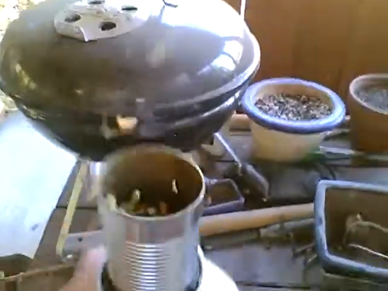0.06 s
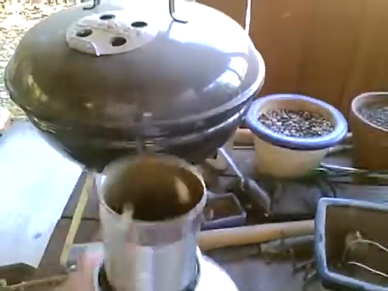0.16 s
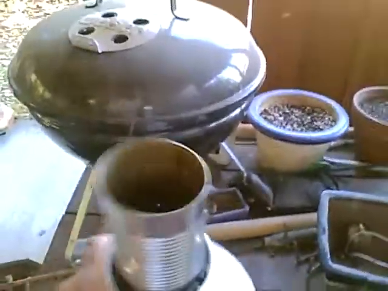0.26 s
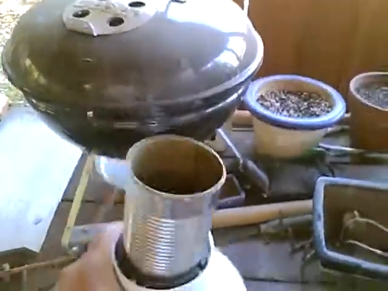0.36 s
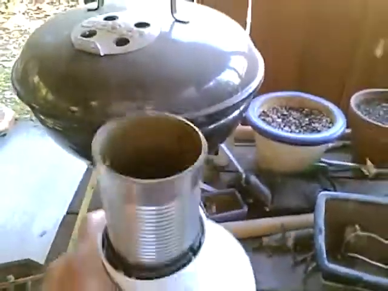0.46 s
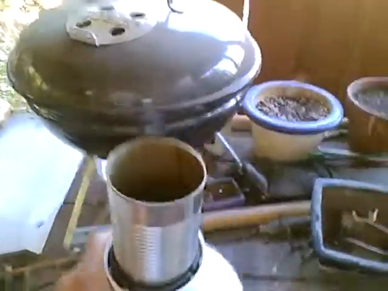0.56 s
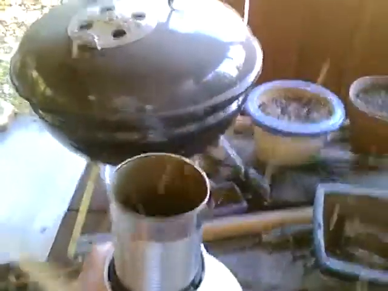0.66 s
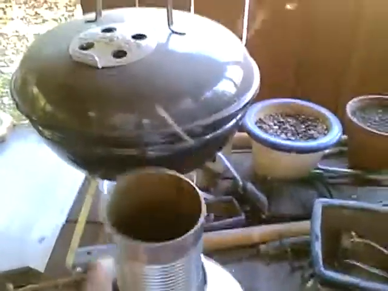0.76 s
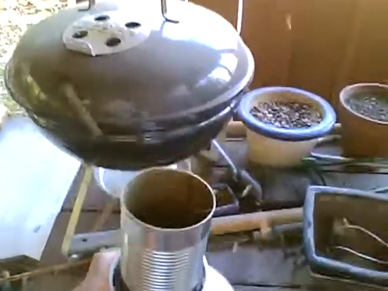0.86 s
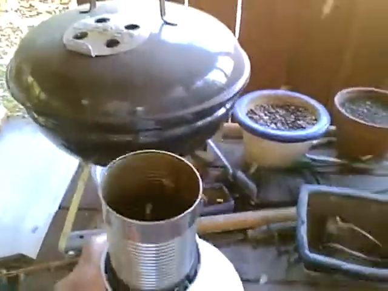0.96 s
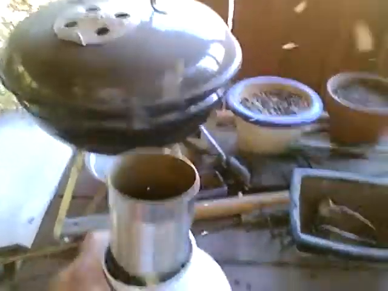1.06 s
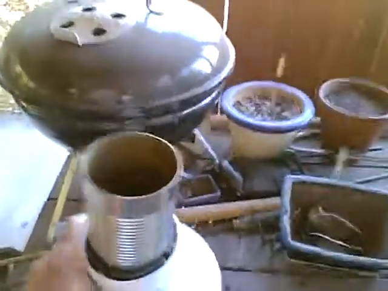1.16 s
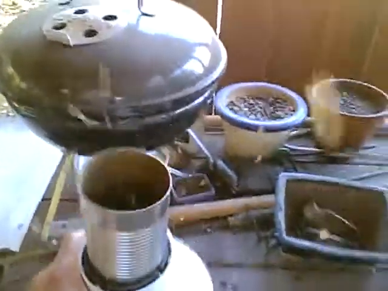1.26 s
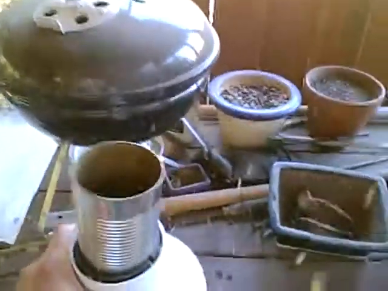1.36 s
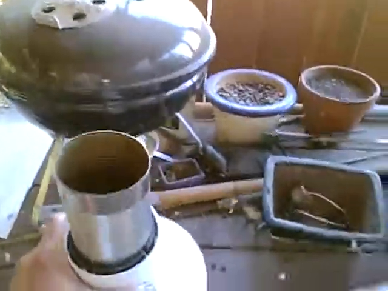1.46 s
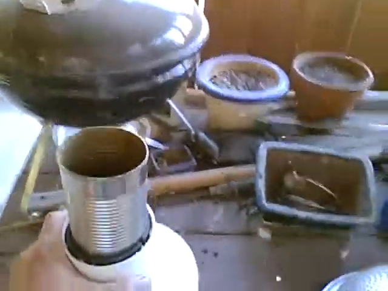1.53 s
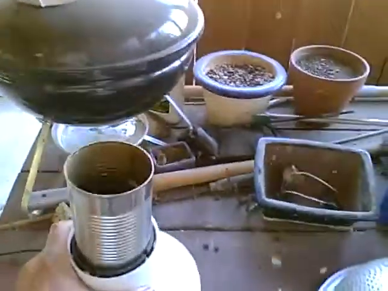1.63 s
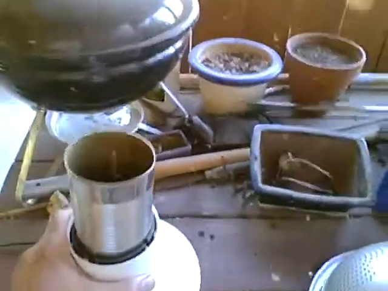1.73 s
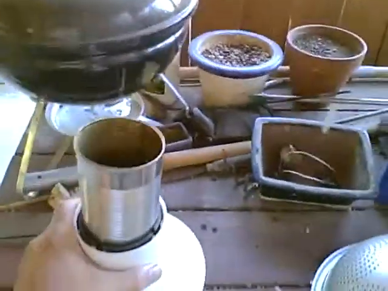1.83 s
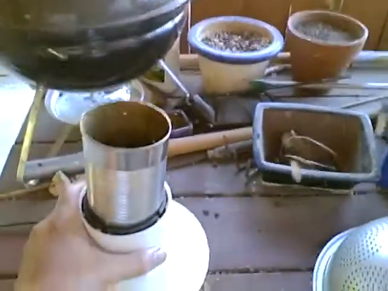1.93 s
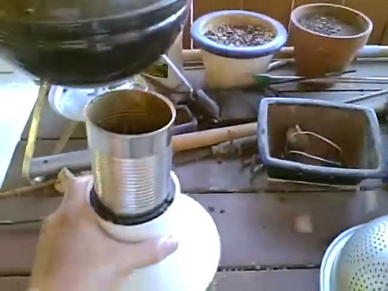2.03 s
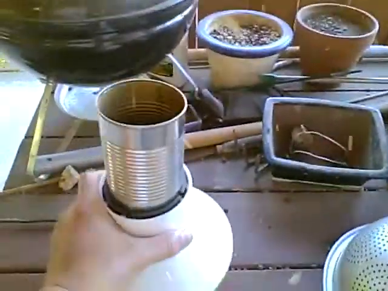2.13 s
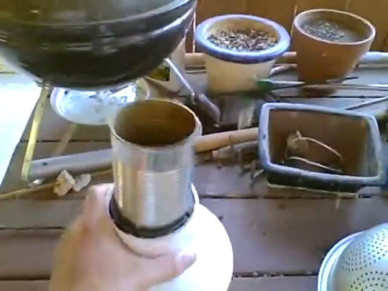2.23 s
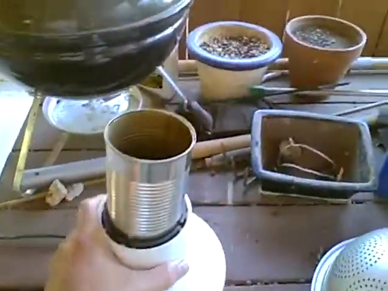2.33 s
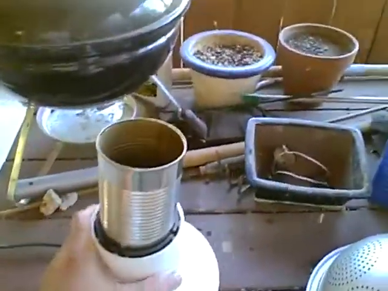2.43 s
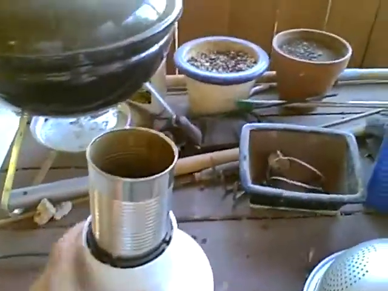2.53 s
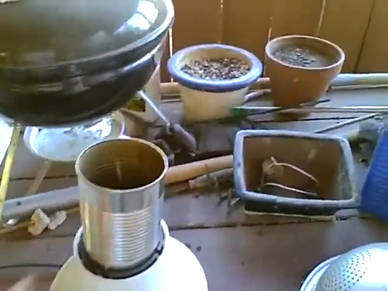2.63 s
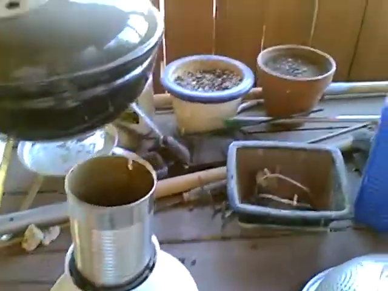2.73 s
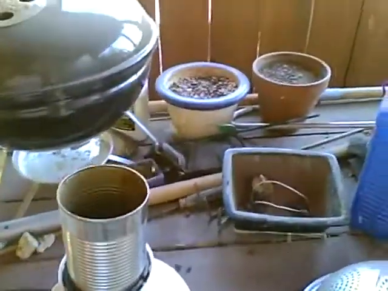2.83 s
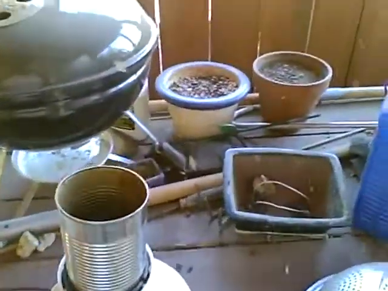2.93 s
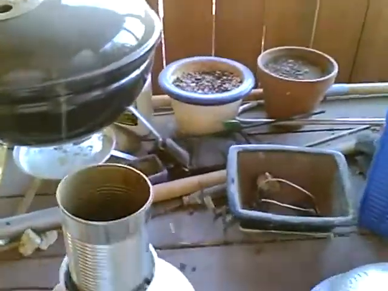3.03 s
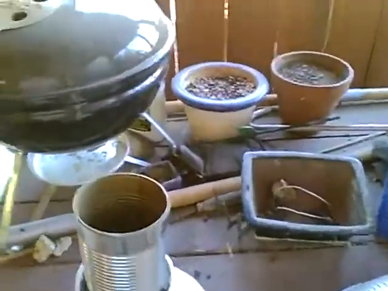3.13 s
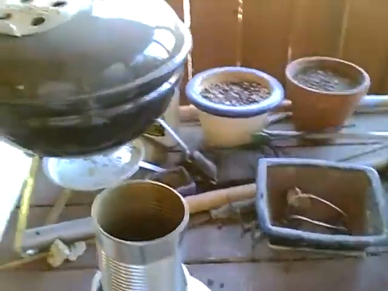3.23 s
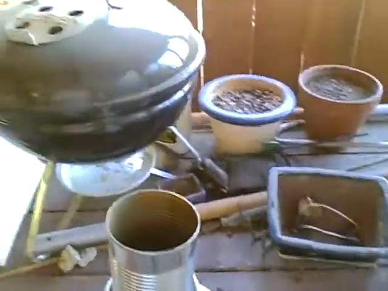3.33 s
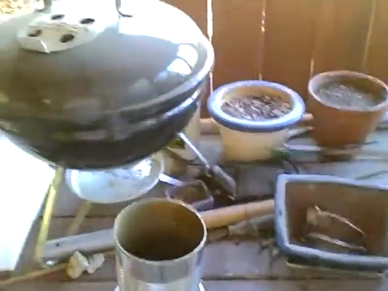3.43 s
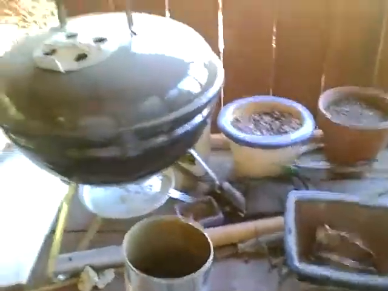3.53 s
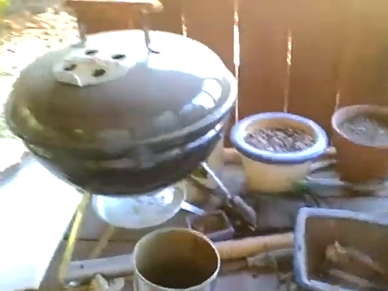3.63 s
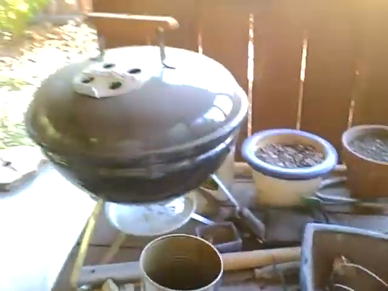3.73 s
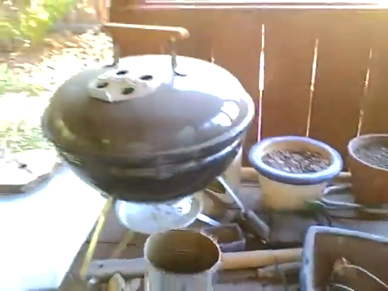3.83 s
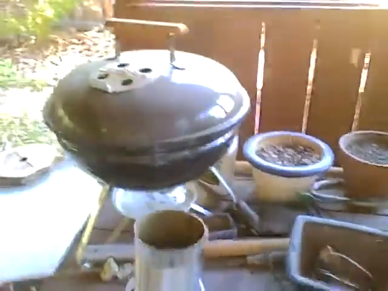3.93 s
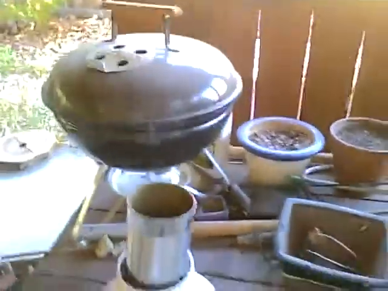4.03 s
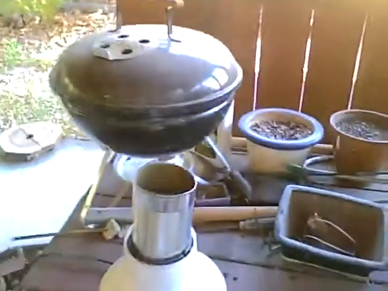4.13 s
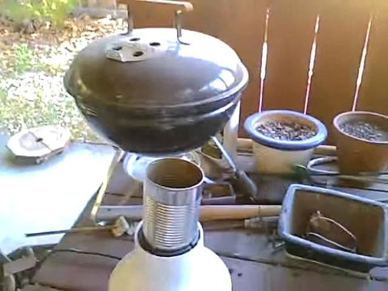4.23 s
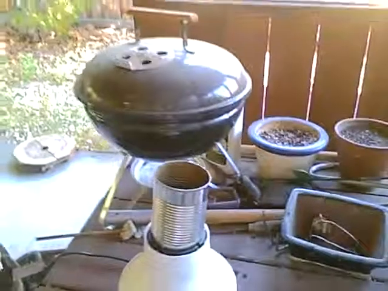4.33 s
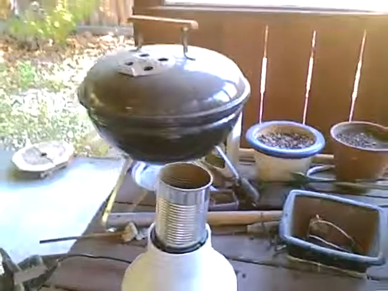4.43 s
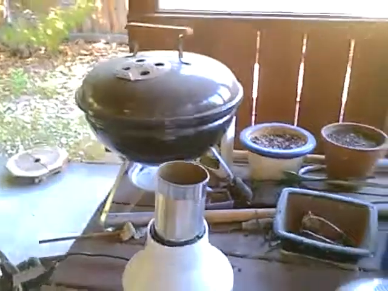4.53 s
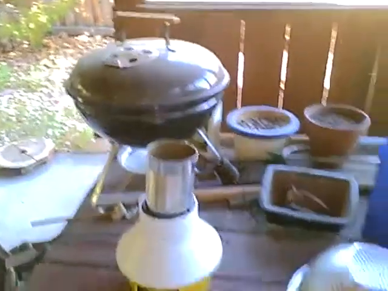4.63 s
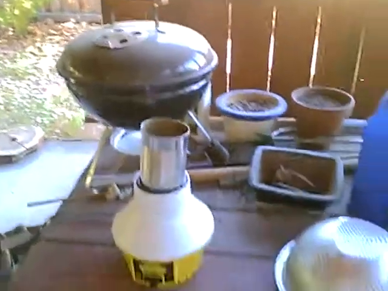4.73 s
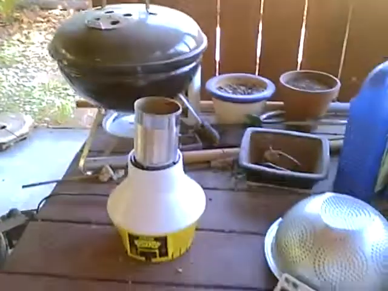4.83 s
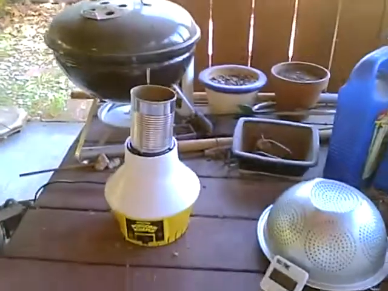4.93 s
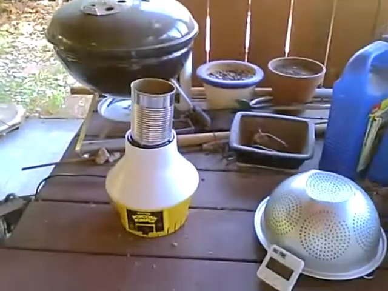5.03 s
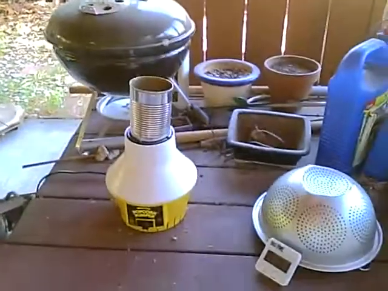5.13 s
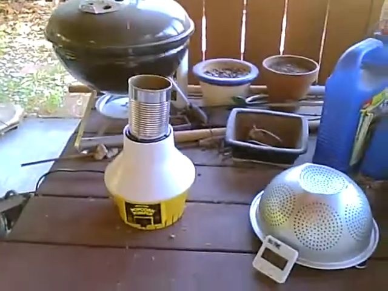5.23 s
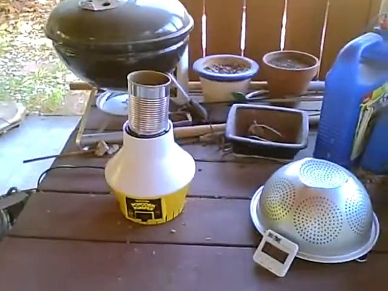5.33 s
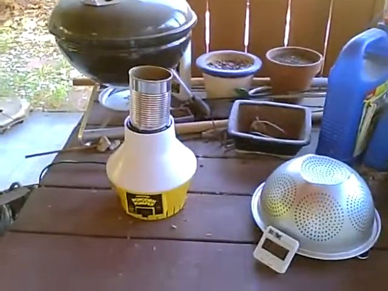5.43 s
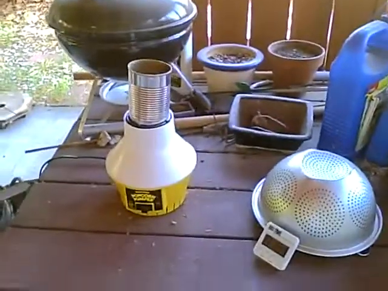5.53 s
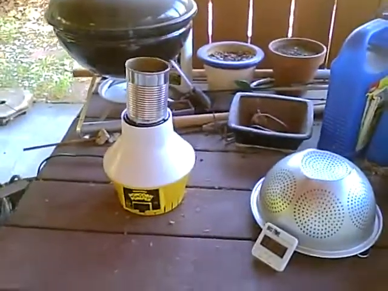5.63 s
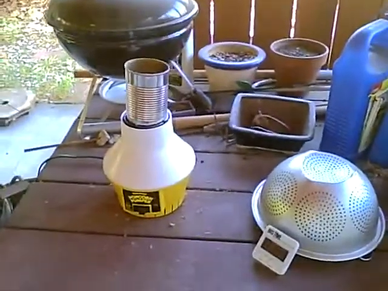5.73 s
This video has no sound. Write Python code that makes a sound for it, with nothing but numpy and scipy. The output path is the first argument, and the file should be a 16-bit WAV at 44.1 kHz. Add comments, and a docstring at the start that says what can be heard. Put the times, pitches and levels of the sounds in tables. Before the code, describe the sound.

A small hot-air fan roars and hums steadily while beans rattle in a shaken tin can, which is then knocked down on wooden boards.

```python
"""A hot-air popper with a tin can for a chimney roasts coffee on a wooden deck; its fan roars and hums throughout.
First a hand shakes it for about two seconds: beans swish and tick on the tin, the body scrapes, the fan buzzes.
Then it is let down with a crack, knocks and a scuff on the boards, and the fan runs back up to speed.
Last, the microphone backs away from the mouth of the can. Noise is shaped into air and friction,
sines make the fan, and random tiny blows make the beans and the rubbing."""
import sys
import numpy as np
from scipy import signal
from scipy.fft import rfft, irfft, next_fast_len
from scipy.io import wavfile

SR = 44100
rng = np.random.default_rng(int(sys.argv[2]) if len(sys.argv) > 2 else 0)


def dump(signal):
    """Clip the signal to [-1, 1] and save it as 16-bit WAV at the path in sys.argv[1]."""
    limited = np.clip(np.atleast_2d(signal).T, -1, 1)
    pcm = np.round(limited * 32767).astype(np.int16)
    wavfile.write(sys.argv[1], SR, pcm)


N = 255339
TIME = np.arange(N) / SR  # seconds

# Outdoor rumble. Each row: frequency in Hz, relative density in dB per Hz.
RUMBLE_SPECTRUM = [(12, -1), (28, 1.5), (40, 1), (58, -4.5), (90, -8.5), (130, -8), (180, -7.5),
                   (300, -1.5), (500, -18.5)]
# Low roar of the air stream. Each row: frequency in Hz, relative density in dB per Hz.
ROAR_SPECTRUM = [(85, -23), (135, -15.5), (170, -17), (210, -12), (300, -11), (400, -5.5), (500, 0),
                 (600, 2), (680, -12.5), (800, -14.5), (950, -14)]
# Rush through the vents. Each row: frequency in Hz, relative density in dB per Hz.
RUSH_SPECTRUM = [(600, -7), (720, -8), (880, 4), (990, -6.5), (1050, -7), (1130, 4), (1250, -4), (1390, 1),
                 (1490, -1.5), (1560, -7), (1750, -7.5), (2000, -4), (2350, -10.5), (2700, -16.5)]
# Hiss of the escaping air. Each row: frequency in Hz, relative density in dB per Hz.
HISS_SPECTRUM = [(2300, -16), (2550, -5.5), (2850, -5), (3250, -2.5), (3550, -2), (3950, -6), (4500, -5),
                 (5100, -9), (5600, -20.5)]
# Beans swirling in the air stream. Each row: frequency in Hz, relative density in dB per Hz.
SIZZLE_SPECTRUM = [(5200, -11), (5520, -1), (5670, -6.5), (5850, -1), (6050, -3), (6500, -0.5),
                   (6750, -13.5), (7050, -15), (7500, -32)]
# Air resonances of the roasting chamber. Each row: frequency in Hz, width in Hz, relative level in dB.
CHAMBER_MODES = [(435.8, 20, 0.5), (477.7, 17, -1), (702, 53, -7.5), (903, 25, -4), (1182, 28, -7.5),
                 (1375, 41, -10.5)]
# Higher air modes along and across the can. Each row: frequency in Hz, width in Hz, relative level in dB.
CAN_AIR_MODES = [(662, 160, 2.5), (786, 190, 1.5), (1760, 430, -21), (2508, 110, -12.5), (5860, 130, -10)]
# Hollow note of the can. Each row: time in seconds, pitch in Hz.
CHIMNEY_PITCH = [(0, 544), (3.4, 555), (3.95, 594), (4.4, 581), (5, 583)]
# The microphone hovers over the can, then backs away. Each row: time in seconds, distance in metres.
MIC_DISTANCE = [(0, 0.45), (1.2, 0.38), (2.2, 0.47), (3.0, 0.43), (3.6, 0.42), (4.3, 0.65), (5, 0.93),
                (5.79, 1.0)]
# The mouth of the can beams sound upwards. Each row: time in seconds, beam strength at the microphone in dB.
MOUTH_BEAM = [(0, -8.5), (1.9, -9.5), (2.7, -4), (3.65, 1), (4.1, -0.5), (4.7, -0.5), (5.1, -3.5),
              (5.79, -7)]
# Narrow hiss at the rim, its pitch set by the listening angle. Each row: time in seconds, pitch in Hz, level in dB.
RIM_HISS = [(0, 3230, -52), (2.2, 3180, -52), (2.9, 3430, -58), (3.5, 3450, -55), (3.95, 3270, -59),
            (4.2, 3200, -52), (4.55, 3250, -53), (4.9, 3190, -61), (5.79, 3380, -76)]
# Air notes that bloom as the microphone passes the mouth. Each row: peak in seconds, pitch in Hz, level in dB.
AIR_BLOOMS = [(3.86, 716, -40.5), (4.03, 710, -40), (4.5, 597, -40.5)]
# Strongest puffs of the can's hollow note. Each row: peak in seconds, level in dB.
NOTE_PUFFS = [(0.255, -35), (1.902, -30), (2.826, -29), (3.591, -32), (3.883, -33), (4.227, -32),
              (5.186, -33.5), (5.291, -34)]
# Fan hum, at the shaft rate. Each row: time in seconds, level in dB.
FAN_HUM = [(0, -48.5), (2, -55), (3.6, -55), (4.05, -49), (4.55, -44), (5, -43)]
# Fan whine. Each row: time in seconds, level of order 4 in dB, level of order 5 in dB.
FAN_WHINE = [(2.2, -53, -53), (2.9, -44.5, -40.5), (3.55, -41.5, -43), (4, -58, -58), (4.28, -47, -47),
             (4.48, -44, -37), (4.66, -46, -41), (4.95, -52, -49), (5.4, -47.5, -50), (5.79, -45, -55)]
# Weaker fan orders. Each row: multiple of the shaft rate, level in dB.
WEAK_ORDERS = [(3, -51.5), (6, -55)]
# Buzz of the shaken fan as it rubs. Each row: multiple of the shaft rate, relative level in dB.
BUZZ_ORDERS = [(1, -12), (2, -3.5), (3, -2), (4, 0.5), (5, 3), (6, 2)]
# Base on the boards. Each row: frequency in Hz, relative density in dB per Hz.
BOARD_SPECTRUM = [(25, -9), (60, -11), (130, -17), (300, -1), (500, -4), (900, -5.5), (1350, 1),
                  (1750, -11.5), (2100, -7), (2800, -14.5), (3300, -9.5), (5000, -31), (6500, -19.5),
                  (7300, -40)]
# Boom of the boards under the skidding base. Each row: frequency in Hz, relative density in dB per Hz.
BOOM_SPECTRUM = [(30, 2), (65, 1), (130, -3), (220, -6)]
# Rim of the base cracking on the boards. Each row: frequency in Hz, relative density in dB per Hz.
CRACK_SPECTRUM = [(150, 3), (350, 6), (600, 5), (1400, 9), (2200, -2), (3500, -2), (5200, -11.5),
                  (6000, -21)]
# Knocks. Each row: start in seconds, clack peak in dB, clack pitch in Hz, thud peak in dB.
KNOCK_BLOWS = [(1.174, -18.5, 1000, -54), (1.431, -20, 1000, -49), (1.45, -21, 1290, -50),
               (1.839, -32, 596, -28), (2.357, -29, 1260, -22), (2.372, -23, 420, -31),
               (2.381, -26.5, 383, -32), (2.388, -28, 397, -28), (2.398, -24, 1270, -29),
               (2.41, -32, 480, -29), (2.419, -21, 1240, -27), (2.445, -26, 442, -39)]
# The tin sings where it rubs in its seat. Each row: peak in seconds, pitch in Hz, level in dB, half-length in seconds.
TIN_SQUEAKS = [(0.526, 2140, -37, 0.02), (0.513, 1210, -25, 0.023), (0.805, 1194, -25.5, 0.02),
               (0.832, 1457, -27, 0.028), (0.89, 1204, -23, 0.034), (0.97, 2120, -33.5, 0.027),
               (1.254, 1444, -33, 0.03), (1.273, 2130, -39, 0.016), (1.306, 1460, -32, 0.021),
               (1.369, 1220, -25.5, 0.031), (1.442, 1470, -35, 0.026), (1.443, 2130, -34.5, 0.026),
               (2.4, 1290, -27, 0.006), (2.418, 1240, -32, 0.005)]
# Rubbing body. Each row: frequency in Hz, relative density in dB per Hz.
SCRAPE_SPECTRUM = [(330, -15.5), (450, -20.5), (620, -7.5), (800, 6), (1000, 6.5), (1250, 7.5), (1470, 2),
                   (1620, -24.5), (2100, -27), (3000, -11), (5000, -32)]
# Juddering housing. Each row: frequency in Hz, relative density in dB per Hz.
JUDDER_SPECTRUM = [(50, -17), (120, -13), (170, -22.5), (230, 1.5), (330, 0), (440, 7), (600, -9.5)]
# Ringing can and housing. Each row: frequency in Hz, relative level in dB, time to fall 60 dB in seconds.
CAN_MODES = [(470.2, -1, 0.2), (710, -7, 0.45), (1000, -8.5, 0.064), (1204, -8, 0.13), (1480, -10.5, 0.05),
             (2135, -9.5, 0.088)]
# Strokes that rub the body. Each row: start in seconds, rise in seconds, length in seconds, initial force in dB.
RUB_STROKES = [(0.01, 0.077, 0.16, -32), (0.401, 0.077, 0.12, -23.5), (0.647, 0.14, 0.36, -21.5),
               (1.181, 0.057, 0.28, -24.5), (1.588, 0.025, 0.067, -33)]
# Jolts that judder the housing harder. Each row: peak in seconds, level in dB.
HOUSING_JOLTS = [(0.045, -42.5), (0.485, -36.5), (0.71, -41), (0.895, -34), (0.96, -35), (1.35, -31.5),
                 (1.385, -28), (1.42, -33), (1.63, -40.5), (1.85, -43), (2.378, -34)]
# Single beans that hit the tin hard. Each row: start in seconds, peak level in dB.
BEAN_PINGS = [(0.059, -24), (0.1895, -39), (0.225, -29), (0.291, -17), (0.2962, -25), (0.321, -19),
              (0.459, -32), (0.5187, -23.5), (0.6998, -26), (0.766, -30), (0.8124, -19), (0.8302, -25),
              (0.8358, -21), (0.8403, -27), (0.8964, -30), (1.032, -22), (1.2472, -31), (1.426, -36),
              (1.469, -27), (1.735, -26), (1.797, -29), (2.393, -30.5), (2.402, -37), (2.412, -31),
              (2.42, -35)]
# Beans on tin. Each row: frequency in Hz, relative density in dB per Hz.
SWISH_SPECTRUM = [(1500, -17.5), (2300, 3), (2750, -8), (3250, -4), (3650, 0), (4050, -8.5), (4600, -5),
                  (5250, -6.5), (5750, 0.5), (6100, 2.5), (6550, 9.5), (6800, -16), (7050, -14),
                  (7550, -12.5)]
# Thin rings of the tin. Each row: frequency in Hz, relative level in dB, time to fall 60 dB in seconds.
TIN_MODES = [(2180, -4, .06), (3680, -14.5, 0.08), (5870, -8.5, 0.06), (6050, -7, 0.07), (6310, -4.5, 0.08),
             (6484, 1.5, 0.079), (6660, -5.5, 0.04)]
# Bunches of beans thrown on the tin, about four a second and again at the landing.
# Each row: peak in seconds, rise in seconds, fall in seconds, force in dB, extra clatter in dB.
BEAN_THROWS = [(0.022, 0.066, 0.035, -29.5, 1), (0.205, 0.035, 0.037, -41, 5.5),
               (0.314, 0.023, 0.037, -25.5, 0), (0.475, 0.022, 0.023, -38, 2),
               (0.545, 0.027, 0.042, -31, 1), (0.715, 0.025, 0.022, -40.5, 3.5),
               (0.82, 0.036, 0.04, -30, 0.5), (0.838, 0.0085, 0.0056, -35.5, 10.5),
               (1.03, 0.046, 0.038, -32.5, 1), (1.265, 0.057, 0.052, -36, 3.5),
               (1.51, 0.059, 0.046, -33, 1), (1.722, 0.034, 0.061, -36, -1), (2.32, 0.021, 0.025, -46.5, 0),
               (2.398, 0.04, 0.025, -44, 4)]


def amp(db):
    """Decibels to gain."""
    return 10 ** (np.asarray(db) / 20)


def unit(x):
    """Scales to rms 1."""
    return x / np.sqrt(np.mean(x ** 2) + 1e-20)


def follow(rows, axis=1):
    """One column of a curve, joined by straight lines, at every sample."""
    rows = np.asarray(rows)
    return np.interp(TIME, rows[:, 0], rows[:, axis])


def drift(hz):
    """Slow random wander of rms 1, up to about the given rate."""
    size = next_fast_len(N, real=True)
    f = np.fft.rfftfreq(size, 1 / SR)
    smooth = rfft(rng.standard_normal(size)) * np.exp(-(f / hz) ** 2)
    return unit(irfft(smooth, size)[:N])


def colour(x, points, size=4096):
    """Causal (minimum-phase) filter with the given spectrum, falling 48 dB an octave beyond its ends."""
    hz, db = np.transpose(points)
    octave = np.log2(abs(np.fft.fftfreq(size, 1 / SR)) + 1)
    beyond = abs(octave - np.clip(octave, np.log2(hz[0]), np.log2(hz[-1])))
    gain_db = np.maximum(np.interp(octave, np.log2(hz), db) - 48 * beyond, -90)
    log_gain = np.log(amp(gain_db))
    taps = np.fft.ifft(np.exp(np.conj(signal.hilbert(log_gain)))).real
    return signal.oaconvolve(x, taps)[:len(x)]


def resonate(x, hz, width):
    """One resonance, fixed or moving; broad noise comes out at the same power whatever the width."""
    turn = np.exp(2j * np.pi * np.cumsum(hz * np.ones(N)) / SR)
    r = np.exp(-np.pi * width / SR)
    # shift the pitch down to zero, smooth, shift back up
    return (turn * signal.lfilter([np.sqrt(1 - r * r)], [1, -r], x / turn)).real


def ring(x, modes, bend=0):
    """Blows played through a table of modes; bend is the share by which each wanders in pitch."""
    total = 0
    for hz, db, t60 in modes:
        pitch = hz * (1 + bend * drift(hz=13)) if bend else hz
        total = total + amp(db) * resonate(x, pitch, width=np.log(1000) / np.pi / t60)
    return unit(total)


def pipe_note(hz, width):
    """Turbulence caught in one air mode: a fuzzy note with steep sides."""
    return unit(resonate(resonate(rng.standard_normal(N), hz, width), hz, width))


def impacts(per_s, spread_db):
    """A random train of tiny blows, a few much harder than the rest."""
    size = amp(spread_db * np.minimum(rng.exponential(1, N), 3.5))
    return unit(size * rng.choice([-1, 1], N) * (rng.random(N) < per_s / SR))


def swells(rows, half_s):
    """Gain of a series of bell-shaped swells."""
    return np.sqrt(sum(amp(db) ** 2 * np.exp(-((TIME - s) / half_s) ** 2) for s, db in rows))


def stroke(start, length, attack, release):
    """Envelope that rises, holds to the end of its length and dies away."""
    rise = np.clip((TIME - start) / attack, 0, 1)
    return rise * np.exp(-np.maximum(TIME - start - length, 0) / release)


def heard(at_1m_db, halving_db):
    """Gain at the microphone's distance: the gain at 1 m, plus a step for each halving of the distance."""
    return amp(at_1m_db - halving_db * np.log2(follow(MIC_DISTANCE)))


def deck(x, delay_s):
    """The boards return the sound a little later, hollowing its colour."""
    returned = colour(x, [(20, -8.0), (1300, 5.5), (2600, -14), (7000, -19.5)])  # the treble scatters
    delayed = np.interp(TIME - delay_s, TIME, returned, left=0)
    return x + 0.21 * follow(MIC_DISTANCE) ** 2 * delayed  # the reflection fades close to the can


def fan_speed():
    """Turns per second: shaking drags the fan down, and it recovers once left alone."""
    free_hz, sag_hz = 249.9, 6.5
    shaken_until_s, recover_s = 1.85, 0.75
    return free_hz - sag_hz * np.exp(-np.maximum(TIME - shaken_until_s, 0) / recover_s)


def shaft(orders, waver, flicker_db):
    """Multiples of the shaft rate, each a sine that flickers on its own; waver is a share of the speed."""
    turns = np.cumsum(fan_speed() * (1 + waver * drift(hz=13.8))) / SR
    total = 0
    for multiple, db in orders:
        level = np.sqrt(2) * amp(db + flicker_db * drift(hz=11))
        total = total + level * np.sin(2 * np.pi * (multiple * turns + rng.random()))
    return total


def throws(clatter=False):
    """How hard the beans press on the tin, or how loudly they clatter: each bunch builds up and trails off."""
    power = 0
    for s, rise, fall, db, clatter_db in BEAN_THROWS:
        side = np.where(TIME < s, rise, fall)
        power = power + amp(db + clatter * clatter_db) ** 2 * np.exp(-((TIME - s) / side) ** 2)
    return np.sqrt(power)


def outdoors():
    """Steady low noise of the open air."""
    return amp(-53.5) * unit(colour(rng.standard_normal(N), RUMBLE_SPECTRUM))


def air_roar():
    """Broad turbulence, with the air of the chamber and the hollow note of the can excited by it."""
    eddies = unit(colour(rng.standard_normal(N), ROAR_SPECTRUM))
    swirl = colour(rng.standard_normal(N), [(400, 0), (1400, 0)])  # a flat band
    chamber = unit(sum(amp(db) * resonate(swirl, hz, width) for hz, width, db in CHAMBER_MODES))
    hollow = pipe_note(follow(CHIMNEY_PITCH), width=40.7)
    chimney = unit(hollow * amp(0.78 * drift(hz=22)))  # its level flickers
    return amp(-4.5) * eddies + amp(-7.0) * chamber + amp(-4.5) * chimney


def air():
    """Turbulence roars in chamber and can, rushes through the vents and hisses out; swirling beans sizzle."""
    beam_db = follow(MOUTH_BEAM)
    higher = unit(sum(amp(db) * pipe_note(hz, width) for hz, width, db in CAN_AIR_MODES)) * amp(beam_db)
    rush = unit(colour(rng.standard_normal(N), RUSH_SPECTRUM))
    spits = amp(-11.5) * impacts(per_s=750, spread_db=4.5)
    hiss = unit(colour(rng.standard_normal(N) + spits, HISS_SPECTRUM))
    grains = amp(5.5) * impacts(per_s=1300, spread_db=2.5)
    sizzle = unit(colour(rng.standard_normal(N) + grains, SIZZLE_SPECTRUM))
    sizzle = sizzle * amp(0.44 * beam_db)  # follows only part of the beam's swing
    vent_note = pipe_note(1400, width=140)  # breathy, carries only a short way
    blown = (air_roar() * heard(at_1m_db=-37.5, halving_db=3.75)
             + higher * heard(at_1m_db=-46.5, halving_db=4.8)
             + rush * heard(at_1m_db=-44, halving_db=3.43)
             + hiss * heard(at_1m_db=-54.5, halving_db=4.17)
             + sizzle * heard(at_1m_db=-56, halving_db=4.6)
             + vent_note * heard(at_1m_db=-55, halving_db=7.3))
    flutter_db = 0.5 * drift(hz=25)
    return deck(blown * amp(flutter_db), delay_s=0.00287)


def rim_hiss():
    """Air shearing over the rim hisses in one narrow band."""
    return pipe_note(follow(RIM_HISS), width=290) * amp(follow(RIM_HISS, axis=2))


def bloom():
    """Hollow notes of the can, each heard only from one narrow angle: narrow noise that swells and fades."""
    return sum(pipe_note(hz, width=100) * swells([(s, db)], half_s=0.076) for s, hz, db in AIR_BLOOMS)


def puffs():
    """Now and then the air stream locks onto the hollow note of the can: a wavering sine for a moment."""
    turns = np.cumsum(follow(CHIMNEY_PITCH) * (1 + 0.023 * drift(hz=40))) / SR
    return np.sqrt(2) * np.sin(2 * np.pi * turns) * swells(NOTE_PUFFS, half_s=0.013)


def motor():
    """The fan hums and whines; its orders swell and fade as the microphone moves through the sound field."""
    strong = [(1, follow(FAN_HUM)), (4, follow(FAN_WHINE, axis=1)), (5, follow(FAN_WHINE, axis=2))]
    return shaft(strong + WEAK_ORDERS, waver=0.001825, flicker_db=0.37)


def scuff():
    """The base skids and chatters over the deck as it settles; the boards boom and the can rings along."""
    start_s, length_s = 2.35, 0.048
    slips = impacts(per_s=1500, spread_db=2.0)
    ringing = unit(colour(ring(slips, CAN_MODES), [(420, 0), (2200, 0)]))
    force = amp(-32.5) * stroke(start_s, length_s, attack=0.022, release=0.052)
    boom = unit(colour(slips, BOOM_SPECTRUM)) * stroke(start_s, length_s, attack=0.01, release=0.042)
    skid = unit(colour(slips, BOARD_SPECTRUM)) + amp(-8.0) * ringing
    return skid * force + amp(-45.0) * boom


def crack(size=4096):
    """The rim of the base lands first: hard plastic meets wood in one short, bright blow."""
    out, t = np.zeros(N), np.arange(size) / SR
    grit = 0.17 * rng.standard_normal(size) * np.exp(-t / 0.0017)
    blow = colour((t == 0) + grit, CRACK_SPECTRUM)
    out[round(2.357 * SR):][:size] = amp(-18) * blow / abs(blow).max()
    return out


def knocks(size=8192):
    """Short blows: a clack from one panel of the housing, and a thud of the base on the boards."""
    out, t = np.zeros(N + size), np.arange(size) / SR
    for s, clack_db, clack_hz, thud_db in KNOCK_BLOWS:
        blow = 0.86 * rng.standard_normal(size) * np.exp(-t / 0.004) + np.exp(-t / 0.0001)
        thud = colour(blow, BOARD_SPECTRUM)
        clack = np.sin(2 * np.pi * clack_hz * t) * np.exp(-t * clack_hz / 3.2)  # dies within a few cycles
        for db, sound in ((clack_db, clack), (thud_db, thud)):
            out[round(s * SR):][:size] += amp(db) * sound / abs(sound).max()
    return out[:N]


def squeaks():
    """Rubbing keeps one mode of the tin going: brief sines, unsteady in pitch and level."""
    unsteady = np.cumsum(1 + 0.008 * drift(hz=90)) / SR
    notes = 0
    for s, hz, db, half_s in TIN_SQUEAKS:
        tone = np.sin(2 * np.pi * (hz * unsteady + rng.random()))
        notes = notes + tone * swells([(s, db)], half_s)
    return notes * amp(1.2 * drift(hz=70))


def scrape():
    """The shaken body sticks and slips; the slips ring the can, the housing judders and the fan rubs."""
    rubbing = 0
    for s, rise, length, db in RUB_STROKES:
        eased_db = db - 11.5 * (TIME - s)  # the grip eases through a stroke, in dB per second
        rubbing = rubbing + amp(eased_db) * stroke(s, length, rise, release=0.08)
    chatter = amp(0.34 * drift(hz=45))  # the contact grabs and lets go, slightly
    force = chatter * np.hypot(rubbing, amp(-3.5) * throws())  # thrown beans push the body too
    slips = impacts(per_s=2200, spread_db=2.5)
    bent = ring(slips, CAN_MODES, bend=0.007)  # the changing grip pulls the modes off pitch
    ringing = unit(colour(bent, [(420, 0), (2200, 0)]))
    buzz = unit(shaft(BUZZ_ORDERS, waver=0.0034, flicker_db=4))
    body = amp(-4.5) * unit(colour(slips, SCRAPE_SPECTRUM)) + amp(-9.0) * ringing + amp(-7.5) * buzz
    judder = unit(colour(impacts(per_s=660, spread_db=2.5), JUDDER_SPECTRUM))
    judder_force = np.hypot(amp(-16.5) * rubbing, swells(HOUSING_JOLTS, half_s=0.017))
    return body * force + judder * judder_force


def pings(size=2048):
    """Single beans stand out of the shower as sharp ticks of decaying noise."""
    out, t = np.zeros(N + size), np.arange(size) / SR
    for s, db in BEAN_PINGS:
        tick = colour(rng.standard_normal(size) * np.exp(-t / 0.0009), SWISH_SPECTRUM)
        out[round(s * SR):][:size] += amp(db) * tick / abs(tick).max()
    return out[:N]


def beans():
    """At each turn of the shake beans hit the tin in a dense shower of ticks; hard landings clatter."""
    ticks = impacts(per_s=4500, spread_db=2.5) * amp(1.0 * drift(hz=120))  # they land in loose clumps
    shower = unit(colour(ticks, SWISH_SPECTRUM)) + amp(-5.0) * ring(ticks, TIN_MODES)
    split = signal.butter(4, 5200, fs=SR, output="sos")  # clatter below 5200 Hz, swish above
    clatter = signal.sosfiltfilt(split, shower)
    swish = shower - clatter
    return swish * throws() + clatter * throws(clatter=True)


def scene():
    """Everything but the outdoor rumble comes from the popper, close by and in the open air."""
    blowing = outdoors() + air() + rim_hiss() + bloom() + puffs() + motor()
    handling = scuff() + crack() + knocks() + squeaks() + scrape() + pings() + beans()
    return (blowing + handling)[None]


def record(dry):
    """A narrow-band microphone: a steep low-pass at 7750 Hz."""
    lowpass = signal.firwin(511, 7750, window=("kaiser", 9), fs=SR)
    return signal.oaconvolve(dry, lowpass[None], "same")


dry = scene()
out = record(dry)
dump(out)
```